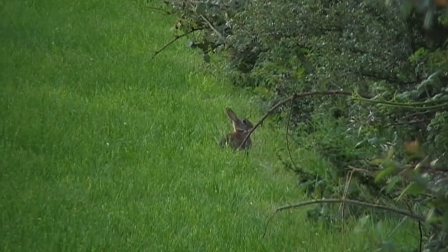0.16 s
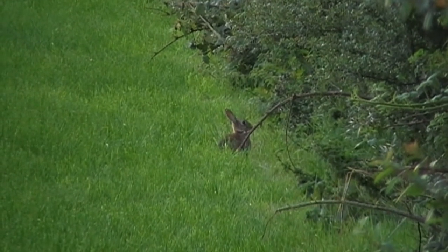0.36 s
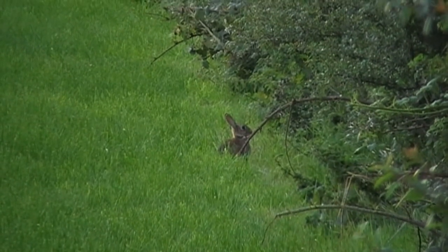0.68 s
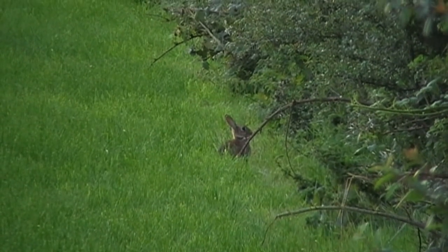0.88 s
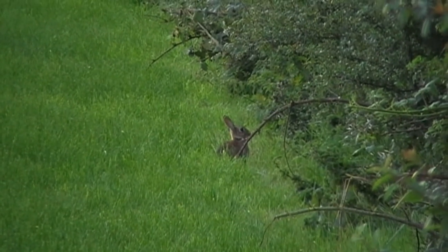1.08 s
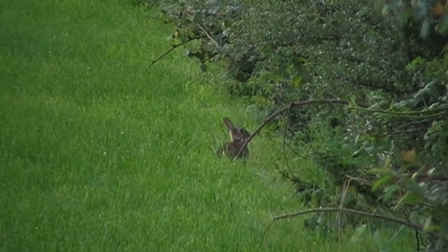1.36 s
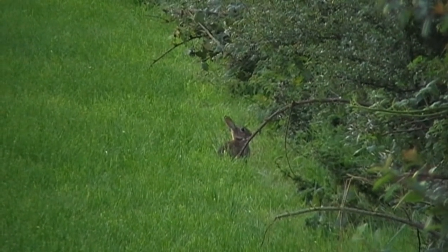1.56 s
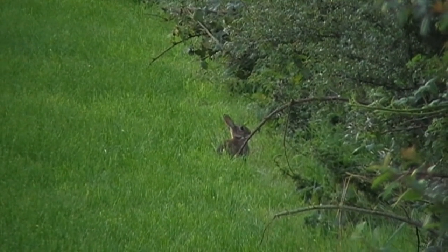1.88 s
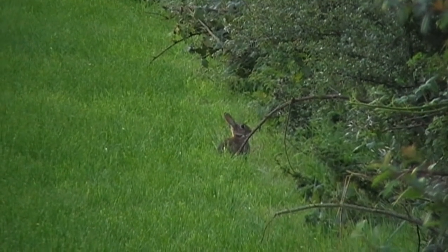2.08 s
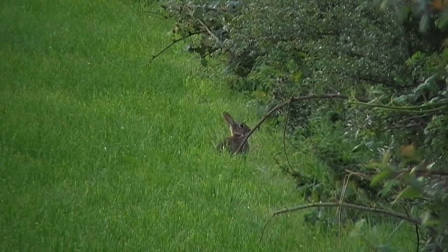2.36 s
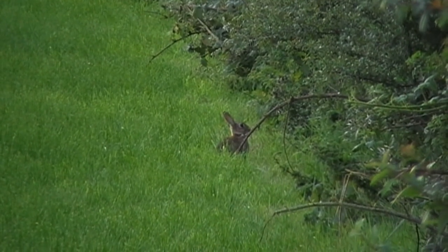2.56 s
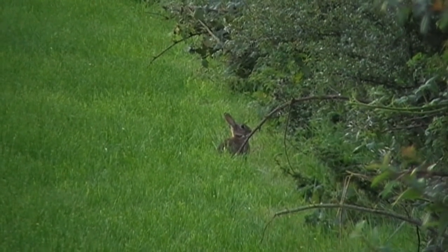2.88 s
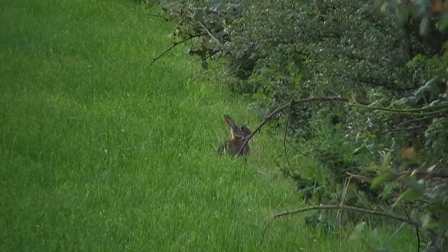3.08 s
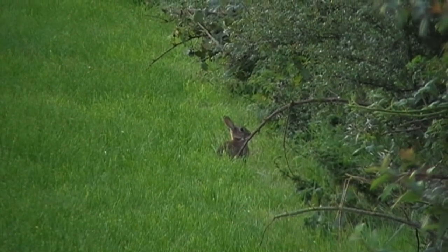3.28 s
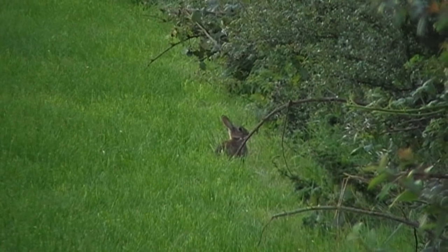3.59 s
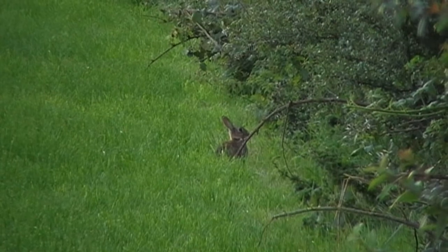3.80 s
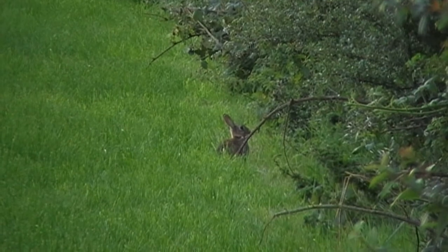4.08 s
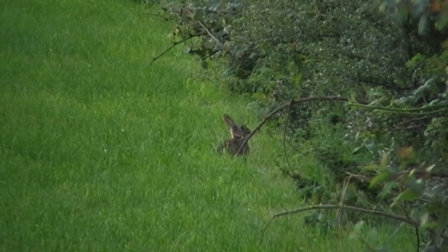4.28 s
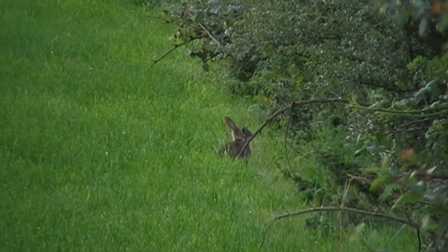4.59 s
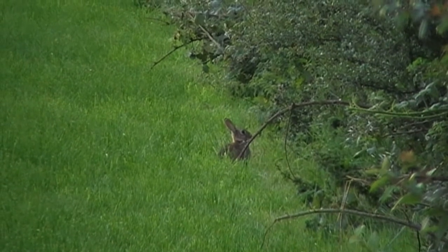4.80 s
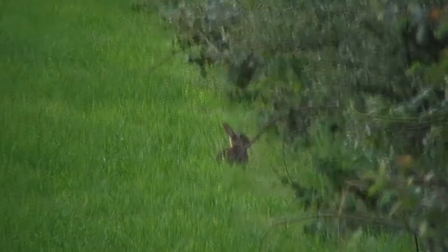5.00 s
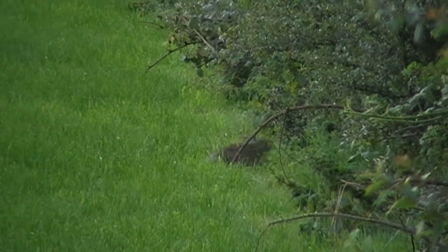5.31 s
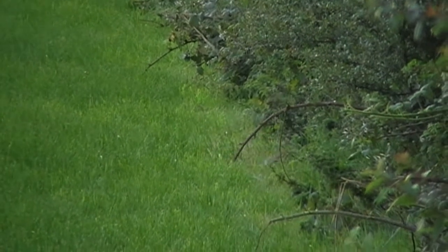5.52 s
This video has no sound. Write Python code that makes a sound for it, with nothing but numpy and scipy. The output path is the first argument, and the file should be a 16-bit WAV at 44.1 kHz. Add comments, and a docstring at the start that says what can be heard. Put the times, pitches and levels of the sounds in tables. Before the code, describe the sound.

Very still outdoor air, picked up in stereo by a softly humming camera. Tiny clicks and a brief faint warble come early, then a clearer click and raspy far bird chatter. A close air rifle slams loudly enough to overload, rattling and ringing; the pellet hisses away, smacks hard, scatters through hedge leaves, and a small low thud and twig tick follow as the echo fades.

```python
"""A quiet field with far birds: a spring air rifle is fired right beside a softly humming camera.
Steady coloured noise makes the air; wavering sines, the camera motor; a gliding sine, raspy noise and ticks, the birds.
Small clicks come before and after the shot: noise bursts and pulses for slam and rebounds, decaying modes for the ring.
The pellet hisses away, smacks, tears into a hedge and drops; a narrow noise band sinks in pitch as the faint echo."""
import sys
import numpy as np
from scipy import signal
from scipy.fft import rfft, irfft
from scipy.io import wavfile
from scipy.ndimage import uniform_filter1d

SR = 44100
rng = np.random.default_rng(int(sys.argv[2]) if len(sys.argv) > 2 else 0)


def wav_record(signal):
    """Record a signal, one row per channel, as 16-bit PCM in the file named by sys.argv[1]."""
    frames = np.transpose(np.atleast_2d(signal))
    bounded = np.clip(frames, -1, 1)
    # unit amplitude maps onto the largest positive 16-bit level
    quanta = np.round(bounded * 32767).astype(np.int16)
    wavfile.write(sys.argv[1], SR, quanta)


N = 249165
TIME = np.arange(N) / SR  # s, whole scene
AGE = np.arange(SR) / SR  # s, since the onset of one sound
SMACK_S = 5.3352

# Spectrum tables hold freq_hz, relative_db (per Hz).


def amp(db):
    """Decibels to gain."""
    return 10 ** (np.asarray(db) / 20)


def evened(x):
    """Scales to rms 1."""
    return x / np.sqrt(np.mean(x ** 2) + 1e-20)


def add(mix, start_s, sound):
    """Lays a sound into the stereo mix, cut at the end of the mix."""
    part = mix[:, round(start_s * SR):][:, :sound.shape[-1]]
    part += sound[..., :part.shape[1]]


def colour(x, spectrum, size=4096):
    """Minimum-phase filter of the given spectrum: nothing sounds before its cause."""
    table_hz, table_db = np.transpose(spectrum)
    bin_hz = abs(np.fft.fftfreq(size, 1 / SR))
    bin_db = np.interp(np.log(bin_hz + 1), np.log(table_hz), table_db)
    log_gain = np.log(amp(bin_db))
    # The Hilbert transform of the log gain is the minimum phase.
    response = np.exp(signal.hilbert(log_gain).conj())
    taps = np.fft.ifft(response).real[:size // 2]
    return signal.oaconvolve(x, taps[None], axes=1)[:, :x.shape[1]]


def pair(count, alike):
    """White noise at two microphones that share the fraction alike of its power."""
    shared, *own = rng.standard_normal((3, count))
    alike = np.clip(alike, 0, 1)
    return np.sqrt(alike) * shared + np.sqrt(1 - alike) * np.array(own)


def swell(rise_s, t60_s):
    """Envelope that rises with time constant rise_s and decays 60 dB per t60_s."""
    return (1 - np.exp(-AGE / rise_s)) * amp(-60 * AGE / t60_s)


def burst(spectrum, db, t60_s, alike, rise_s=0.00013):
    """A dense cloud of vibrations as shaped noise: it swells and dies away."""
    shape = swell(rise_s, t60_s)
    noise = evened(colour(pair(SR, alike) * shape, spectrum))
    shape_rms = np.sqrt(np.mean(shape ** 2))
    return amp(db) * noise * shape_rms


def strike(spectrum, peak_db):
    """One sharp pulse of the given colour and peak level."""
    pulse = colour(signal.unit_impulse(SR)[None], spectrum)
    return amp(peak_db) * pulse / abs(pulse).max()


def field(hiss_db=-56.5, growth_db=1.0, rumble_db=-70):
    """Still air: diffuse far hiss that grows a little, over a low rumble."""
    air_spectrum = [(47, -34.5), (80, -22), (142, -8), (294, -3.5), (500, -2), (800, 0.5), (1200, -2.5),
                    (2000, -9), (2900, -16), (4400, -18.5), (6500, -22.5), (9500, -26.5), (12000, -31.5),
                    (15500, -37.5)]
    rumble_spectrum = [(25, 1.5), (70, -9.5), (100, -1.5), (150, -3), (220, -8.5), (500, -24.5), (2000, -69.5)]
    level_db = hiss_db + growth_db * (TIME / TIME[-1] - .5)
    hiss = evened(colour(pair(N, alike=.06), air_spectrum)) * amp(level_db)
    rumble = evened(colour(pair(N, alike=1.0), rumble_spectrum))
    return hiss + amp(rumble_db) * rumble


def motor(waver_rad=.15):
    """Camera motor: hum and thin whine, carried through the body to both microphones."""
    # freq_hz, rms_db
    tones = [(50, -54.5), (150.2, -74.5), (721, -87), (2163, -74), (4326, -84), (5600, -90), (5888, -98),
             (8652, -99), (11536, -94.5), (15625, -93)]
    slow_hz = np.geomspace(.3, 4, 10)
    wander = evened(sum(np.sin(2 * np.pi * (hz * TIME + rng.random())) / hz for hz in slow_hz))
    out = np.zeros(N)
    for hz, rms_db in tones:
        waver = waver_rad * np.sqrt(hz / 1000) * wander  # waver_rad holds at 1 kHz
        phase = 2 * np.pi * (hz * TIME + rng.random()) + waver
        out += amp(rms_db) * np.sqrt(2) * np.sin(phase)
    return out


def bird(start_s=1.16, length_s=.135, level_db=-72, tremble_db=4):
    """A small bird's warble: trilled, trembling sine of falling pitch under one arch."""
    start_hz, sag_hz_per_s, flutter_hz = 4500, 11800, 150
    trill_hz, trill_depth_hz = 23, 280
    out = np.zeros((2, N))
    t = AGE[AGE < length_s]
    slow_noise = [evened(uniform_filter1d(row, size=300)) for row in rng.standard_normal((2, SR))]
    wobble, tremble = (row[:len(t)] for row in slow_noise)
    trill = trill_depth_hz * np.sin(2 * np.pi * trill_hz * t)
    pitch_hz = start_hz - sag_hz_per_s * t + trill + flutter_hz * wobble
    arch = np.sqrt(np.sin(np.pi * t / length_s))
    tone = np.sin(2 * np.pi * np.cumsum(pitch_hz) / SR)
    add(out, start_s, arch * amp(level_db + tremble_db * tremble) * tone)
    return out


def chatter(count=6, start_s=4.411, gap_s=.075, gap_growth_s=.0058, level_db=-52.5, arch_db=2.1):
    """A far bird's raspy syllables, blurred by distance: they slow down, swell and fade."""
    rasp_spectrum = [(700, -28), (1500, -2), (2200, 0.5), (2800, -11), (4000, -32), (8000, -44.5)]
    out = np.zeros((2, N))
    for k in range(count):
        syllable_s = start_s + k * gap_s + gap_growth_s * k * (k - 1) / 2
        db = level_db + arch_db * np.sin(np.pi * k / (count - 1))
        add(out, syllable_s, burst(rasp_spectrum, db, t60_s=0.19, alike=0.75, rise_s=0.016))
    return out


def ticks(width_ratio=1.2, skirt_db=-16):
    """Faint narrow-band ticks of noise: far birds early on, hedge twigs after the smack."""
    # start_s, level_db, centre_hz
    tick_table = [(.298, -62.5, 5300), (.398, -63, 9700), (2.6, -70, 10000), (5.427, -46, 4870),
                  (5.615, -52, 2820)]
    out = np.zeros((2, N))
    for start_s, db, hz in tick_table:
        band = [(hz / 2, -40), (hz / width_ratio, skirt_db), (hz, 0), (hz * width_ratio, skirt_db), (hz * 2, -40)]
        add(out, start_s, burst(band, db, t60_s=0.058, alike=1.0, rise_s=0.0022))
    return out


def falling_echo(delay_s=.06, level_db=-51.5, octave_db=-7):
    """The smack returns as a faint echo: a noise band and its octave sink to a final pitch."""
    start_hz, end_hz, sink_s, width_hz = 2030, 1600, 0.077, 280
    out = np.zeros((2, N))
    centre_hz = end_hz + (start_hz - end_hz) * np.exp(-AGE / sink_s)
    carrier = np.exp(2j * np.pi * np.cumsum(centre_hz) / SR)
    shape = swell(rise_s=0.053, t60_s=0.85)
    for k, db in ((1, level_db), (2, level_db + octave_db)):
        noise = pair(SR, alike=0.86) + 1j * pair(SR, alike=0.96)
        low_pass = signal.butter(2, k * width_hz / 2, fs=SR)
        blur = signal.lfilter(*low_pass, noise)
        add(out, SMACK_S + delay_s, amp(db) * shape * evened((blur * carrier ** k).real))
    return out


def leaves(count=6, rip_s=5.367, span_s=.055, tick_db=-34, fall_db_per_s=172):
    """The pellet rips into the hedge, then ticks through leaves ever more weakly."""
    leaf_spectrum = [(300, -45), (1000, -29), (2000, -23), (4500, -6.5), (6500, 2), (8300, 6), (10000, 0),
                     (13000, -14), (16000, -30)]
    out = np.zeros((2, N))
    add(out, rip_s, burst(leaf_spectrum, db=-28.5, t60_s=.06, alike=0.98, rise_s=.0012))
    for after_s in span_s * (np.arange(count) + rng.random(count)) / count:
        db = tick_db - fall_db_per_s * after_s
        add(out, rip_s + after_s, burst(leaf_spectrum, db, t60_s=0.011, alike=0.95))
    return out


def pellet(muzzle_s=5.075, thud_s=5.424, smack_db=-3.0, lean_db=1.0):
    """Flight hiss, a sharp smack, scatter off the hedge, a far echo, then a thud on the ground."""
    flight_spectrum = [(400, -24.5), (1200, -17), (2500, -5.5), (4000, -4.5), (8000, 3), (11000, 0),
                       (15500, -19)]
    smack_spectrum = [(200, -48), (900, -26), (1300, -15), (1800, -3), (2500, 1.5), (3100, -4), (3800, -20),
                      (4800, -0.5), (5800, -12.5), (7200, 3), (9000, 1), (11000, -7), (14200, -19),
                      (15800, -42.5)]
    scatter_spectrum = [(400, -37), (1100, -14), (1900, -0.5), (2800, 0.5), (4000, -2), (7000, 1.5),
                        (10000, -4), (15000, -28)]
    echo_spectrum = [(300, -14), (1000, -15), (1800, -2.5), (2700, -5), (4800, -3.5), (7000, -12.5),
                     (10000, -21), (15000, -46)]
    turf_spectrum = [(60, -10), (200, -6), (350, -8), (800, -30), (8000, -70)]
    out = np.zeros((2, N))
    add(out, muzzle_s, burst(flight_spectrum, db=-43.5, t60_s=1.2, alike=.9, rise_s=.01))
    out *= np.clip((SMACK_S + .02 - TIME) / 0.018, 0, 1)  # hiss fades out just after the smack
    add(out, SMACK_S, strike(smack_spectrum, smack_db) * amp([[lean_db], [-lean_db]]))
    add(out, SMACK_S, burst(scatter_spectrum, db=-32, t60_s=0.18, alike=1.0))
    add(out, SMACK_S, burst(echo_spectrum, db=-45, t60_s=0.67, alike=1.0, rise_s=0.032))
    add(out, thud_s, burst(turf_spectrum, db=-51.5, t60_s=.05, alike=1.0))
    return out


def handling(clink_alike=0.56, lean_db=2.0, port_phase_rad=0.5, rise_s=0.00092):
    """Light clicks of the gun's fittings: a short woody modal ring and a bright clink of noise."""
    # start_s, dull_click_db, bright_clink_db
    clicks = [(.077, -53, -66), (.401, -55, -66), (.431, -58, -70), (1.8665, -47, -60),
              (4.2432, -33, -48.5), (5.2412, -45, -36), (5.2875, -62, -46.5), (5.3078, -39, -47)]
    # freq_hz, relative_db, t60_s
    modes = [(578, -12.5, 0.058), (1030, -5.5, 0.036), (1180, 3.5, 0.019), (1610, -19, .025),
             (3220, -13, 0.024), (3980, -12, 0.024), (9300, -23, .008)]
    clink_spectrum = [(300, -30), (1200, -10), (2400, 1), (3200, -4), (3900, -5.5), (5200, -9), (7000, -17),
                      (9500, -16.5), (15000, -29)]
    out, ring = np.zeros((2, N)), np.zeros((2, SR))
    port_phase = port_phase_rad * np.array([[1], [-1]])
    for k, (hz, db, t60_s) in enumerate(modes):
        phase = (-1) ** k * port_phase  # flips from mode to mode
        ring += amp(db - 60 * AGE / t60_s) * np.sin(2 * np.pi * hz * AGE + phase)
    ring *= (1 - np.exp(-AGE / rise_s)) * amp([[lean_db], [-lean_db]])
    for start_s, dull_db, bright_db in clicks:
        clink = burst(clink_spectrum, bright_db, t60_s=.028, alike=clink_alike)
        add(out, start_s, amp(dull_db) * ring + clink)
    return out


def rattle(count=4, start_s=5.1045, gap_s=.0135, jitter_s=.001, t60_s=0.06):
    """The action settles in nearly even, ever weaker bounces, listed as further blows."""
    knock_db, knock_fall_db_per_s = -24, 300.5
    clash_db, clash_fall_db_per_s = -37, 70
    bounces = []
    for after_s in np.arange(count) * gap_s:
        bounce_s = start_s + after_s + jitter_s * rng.uniform(-1, 1)
        bounce_knock_db = knock_db - knock_fall_db_per_s * after_s
        bounce_clash_db = clash_db - clash_fall_db_per_s * after_s
        bounces.append((bounce_s, bounce_knock_db, bounce_clash_db, t60_s))
    return bounces


def rock(x, lag_rad=2.19, centre_hz=480, width_octaves=0.74):
    """The low middle of a knock rocks the camera: one port lags the other in phase."""
    hz = np.fft.rfftfreq(N, 1 / SR)
    octaves_off = np.log2((hz + 1) / centre_hz)
    lag = lag_rad * np.exp(-.5 * (octaves_off / width_octaves) ** 2)
    return np.array([x[0], irfft(rfft(x[1]) * np.exp(-1j * lag), N)])


def ringing(blows, split_hz=3000, spread_rad=.55, ring_db=1.0, soft_s=0.0017, grip_s=5.33, grip_t60_s=.25):
    """Blows feed energy to each mode, knocks the low and clashes the high, until the grip damps them."""
    # modes of barrel, cylinder and spring: freq_hz, relative_db, t60_s
    modes = [(321, -49.5, 0.55), (584, -33, 0.1), (817, -28.5, 0.17), (896, -28.5, .3), (958, -30, 0.12),
             (1034, -29.5, .11), (1092, -31.5, .1), (1180, -28.5, 0.076), (1221, -25.5, .11),
             (1903, -24.5, .13), (1965, -32, .12), (2067, -32, .12), (2383, -42.5, 1.15), (2919, -56, .6),
             (5460, -60, 1.5), (5460, -47, .7), (7156, -57, .8), (7400, -33.5, .08), (7778, -54.5, .8),
             (8200, -27, .11), (8650, -28, .08), (8598, -33, .1), (9100, -34.5, .08), (11510, -38, .09)]
    blow_s, knock_db, clash_db, _ = np.transpose(blows)
    first_s = blow_s.min()
    blow_index = np.round((blow_s - first_s) * SR).astype(int)
    out = np.zeros((2, SR))
    for hz, db, t60_s in modes:
        blow_db = knock_db if hz < split_hz else clash_db
        fed = np.bincount(blow_index, amp(blow_db) ** 2, SR)
        energy_decay = amp(-60 / (t60_s * SR)) ** 2  # per sample
        energy = signal.lfilter([1], [1, -energy_decay], fed / fed.sum())
        # One-pole smoothing softens the onsets.
        size = signal.lfilter([1 / (soft_s * SR)], [1, 1 / (soft_s * SR) - 1], np.sqrt(energy))
        # Each mode reaches the two ports differently.
        phase = 2 * np.pi * rng.random() + spread_rad * (2 * rng.random((2, 1)) - 1)
        out += amp(db + ring_db) * size * np.sin(2 * np.pi * hz * AGE + phase)
    gripped_s = np.maximum(first_s + AGE - grip_s, 0)
    return first_s, out * amp(-60 * gripped_s / grip_t60_s)


def rifle(knock_alike=0.55, clash_alike=0.61, lean_db=0.8):
    """Release, piston slam, rebounds and rattle knock the stock, clash the steel and ring the modes."""
    # main blows, release to slam and rebounds: start_s, stock_knock_db, steel_clash_db, t60_s
    main_blows = [(5.0559, -40, -54, .04), (5.0583, -12.5, -21.5, .04), (5.0625, -7, -20, .033),
                  (5.0666, -6, -12.5, .022), (5.0706, -22, -11.5, .07), (5.0822, -14, -23, .04),
                  (5.0843, -16.5, -10, .034), (5.0936, -12.5, -21, .05), (5.0960, -16, -16, .042)]
    stock_spectrum = [(30, -38.5), (90, -28), (150, -28), (260, -16.5), (430, -9), (590, -3.5), (700, -8),
                      (850, 0), (1200, 3.5), (1550, -10.5), (2100, -3.5), (3000, -12.5), (4500, -12),
                      (8000, -18), (16000, -49.5)]
    steel_spectrum = [(200, -44.5), (1000, -12.5), (2600, -18.5), (4400, -11), (6500, -7), (8200, -0.5),
                      (9500, -6.5), (12000, -11.5), (15000, -21.5), (17000, -22.5)]
    # the piston's single crack
    slam_spectrum = [(200, -23), (600, -10.5), (1200, -2), (1800, -3), (2700, 5.5), (4000, -0.5),
                     (6000, -17.5), (9000, -17.5), (15000, -23.5)]
    # low push of the recoil
    recoil_spectrum = [(30, -11), (70, -10), (120, -1), (190, 8.5), (270, -18), (500, -26), (2000, -57)]
    slam_s, slam_db = 5.0669, 4.0
    recoil_s, recoil_db = 5.0605, [[-27], [-33]]  # peak at each port
    blows = main_blows + rattle()
    knocks, out = np.zeros((2, 2, N))
    for start_s, knock_db, clash_db, t60_s in blows:
        add(knocks, start_s, burst(stock_spectrum, knock_db, t60_s, knock_alike))
        add(out, start_s, burst(steel_spectrum, clash_db, t60_s, clash_alike))
    add(out, *ringing(blows))
    add(out, slam_s, strike(slam_spectrum, slam_db))
    add(out, recoil_s, strike(recoil_spectrum, recoil_db))
    return out + rock(knocks) * amp([[lean_db], [-lean_db]])


def scene():
    """Everything at the two microphones."""
    background = field() + motor() + bird() + chatter() + ticks()
    hedge = falling_echo() + leaves()
    return background + hedge + pellet() + handling() + rifle()


def record(dry, edge_hz=16100):
    """Peaks beyond full scale clip; then a low-pass limits the band."""
    low_pass = signal.firwin(255, edge_hz, window=("kaiser", 7), fs=SR)
    return signal.oaconvolve(np.clip(dry, -1, 1), low_pass[None], "same")


dry = scene()
out = record(dry)
wav_record(out)
```